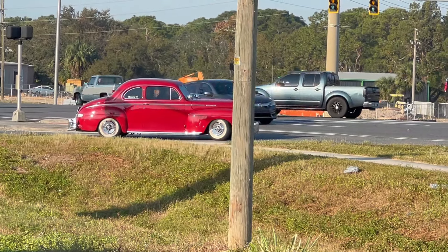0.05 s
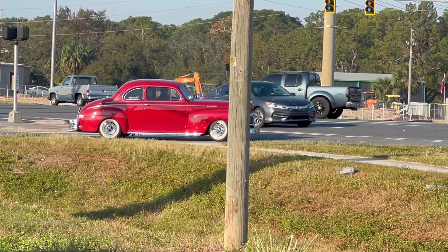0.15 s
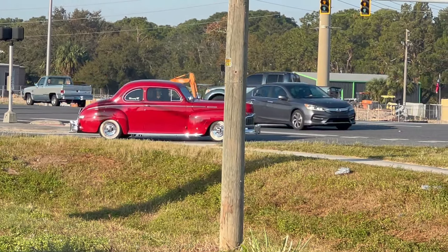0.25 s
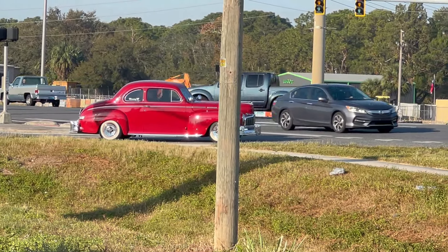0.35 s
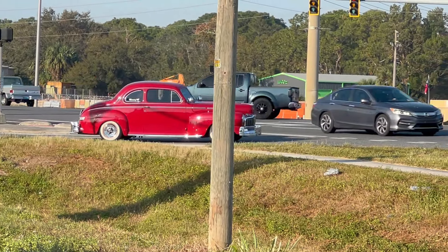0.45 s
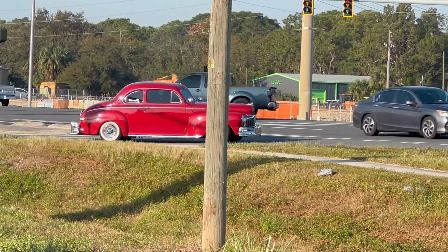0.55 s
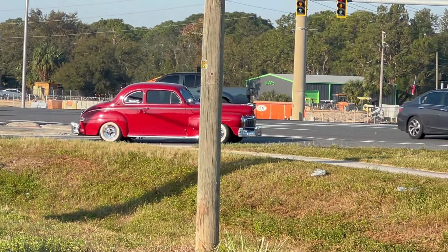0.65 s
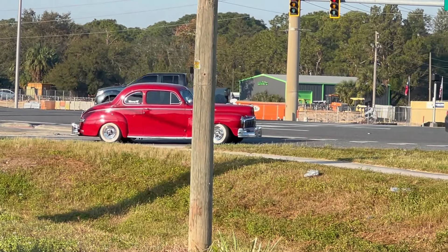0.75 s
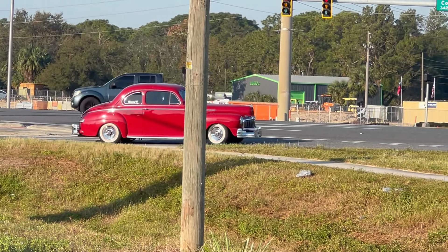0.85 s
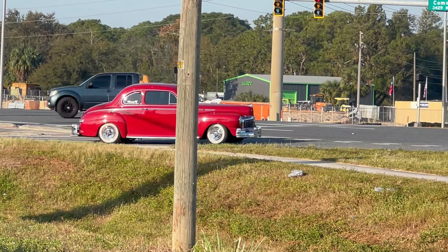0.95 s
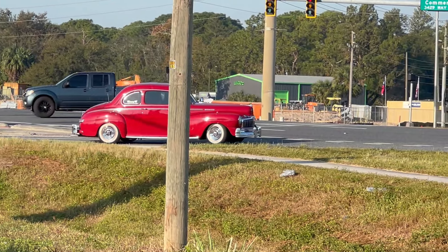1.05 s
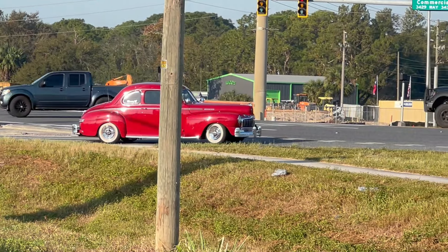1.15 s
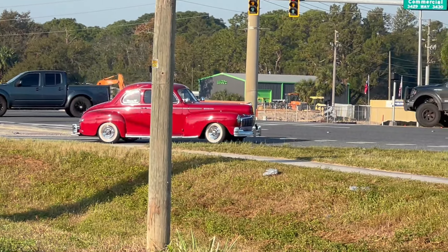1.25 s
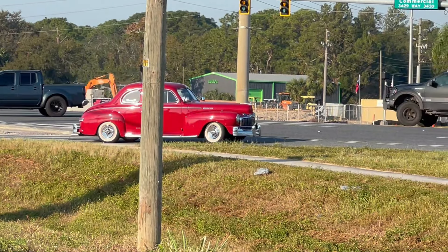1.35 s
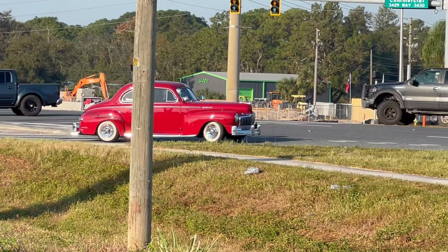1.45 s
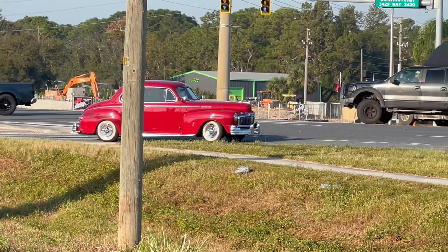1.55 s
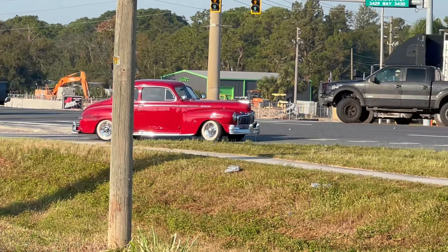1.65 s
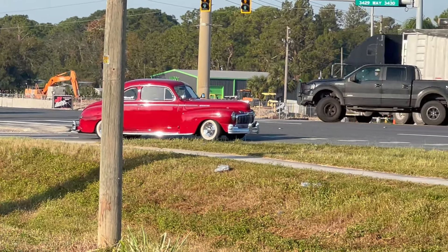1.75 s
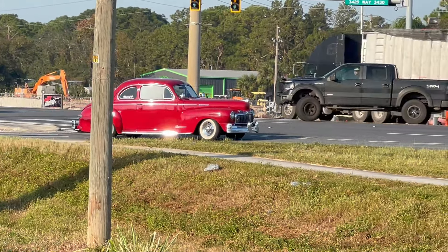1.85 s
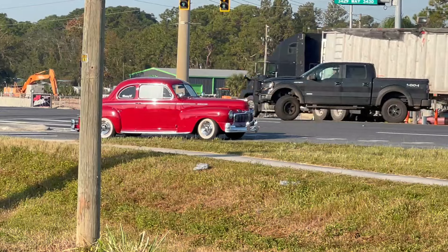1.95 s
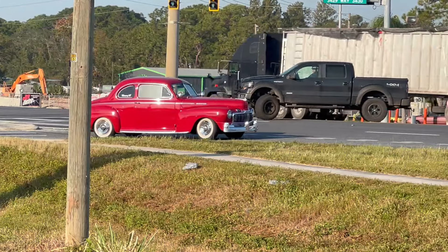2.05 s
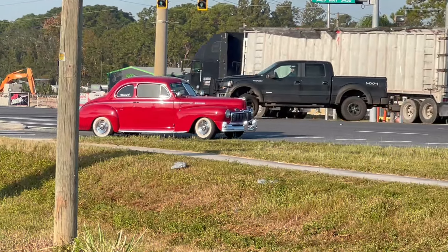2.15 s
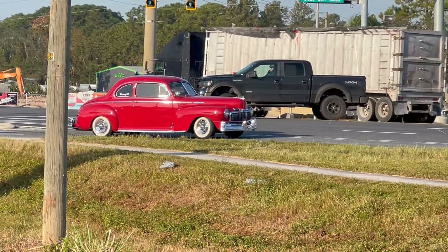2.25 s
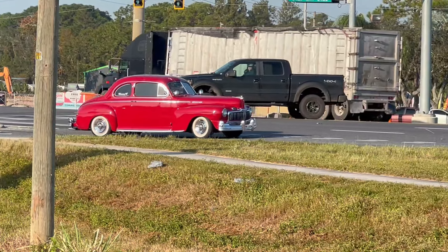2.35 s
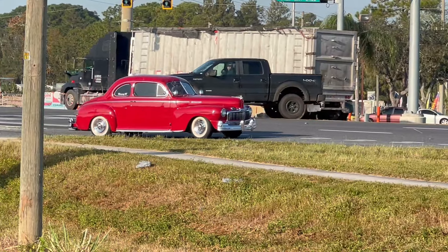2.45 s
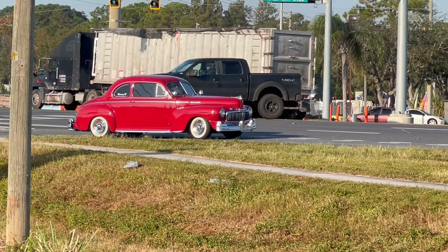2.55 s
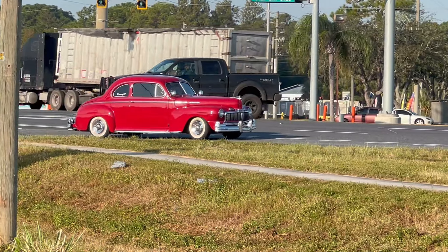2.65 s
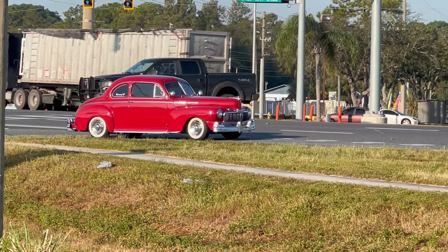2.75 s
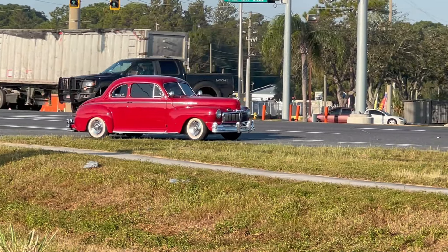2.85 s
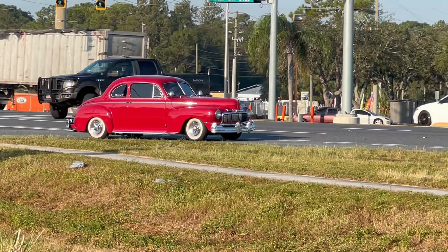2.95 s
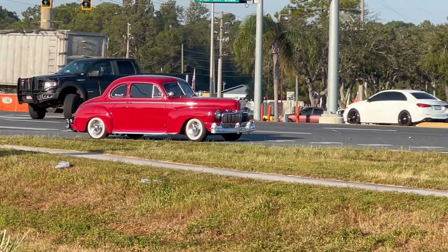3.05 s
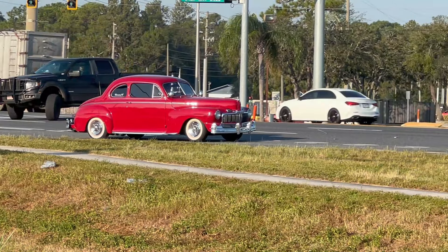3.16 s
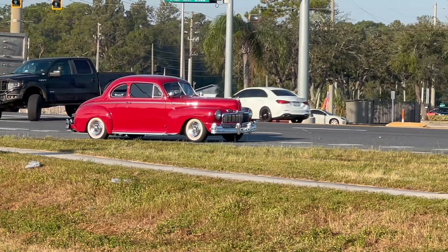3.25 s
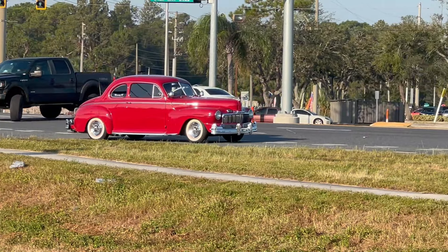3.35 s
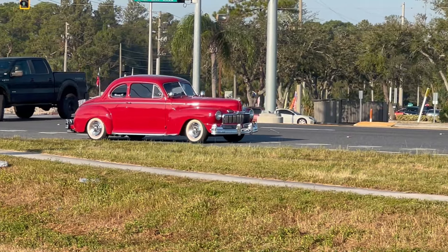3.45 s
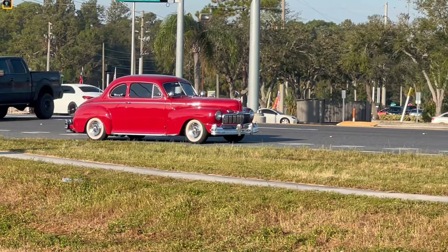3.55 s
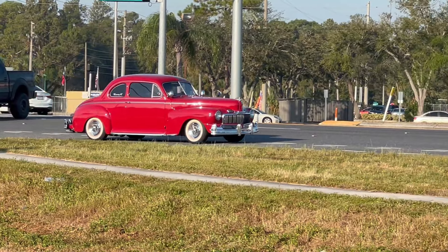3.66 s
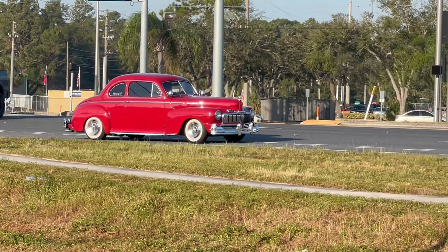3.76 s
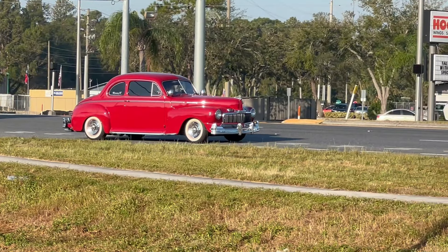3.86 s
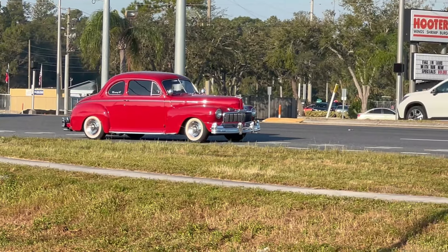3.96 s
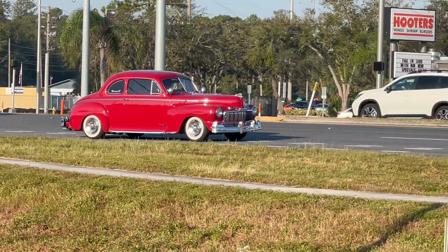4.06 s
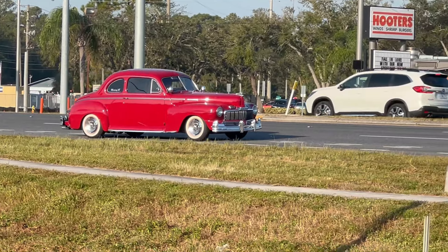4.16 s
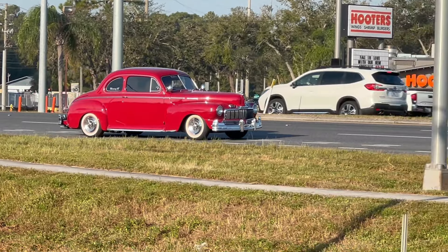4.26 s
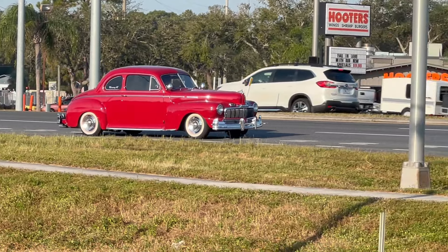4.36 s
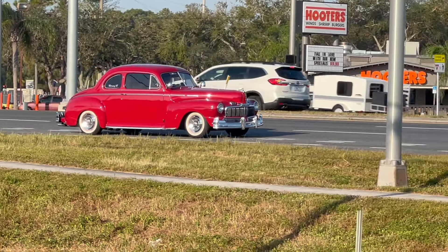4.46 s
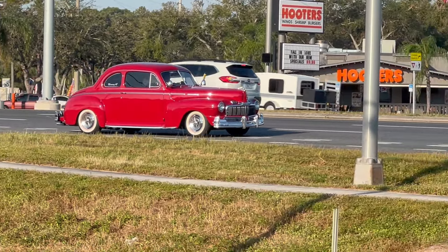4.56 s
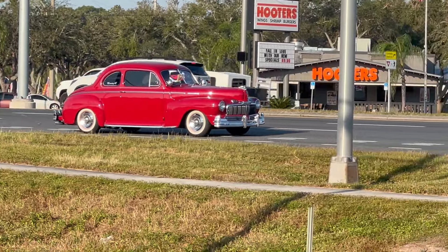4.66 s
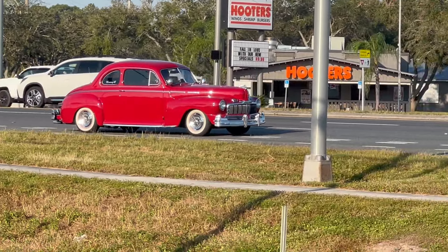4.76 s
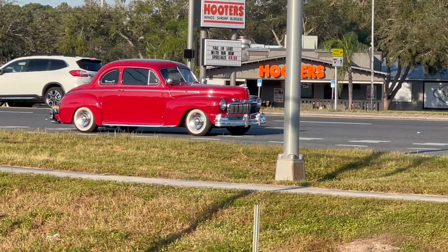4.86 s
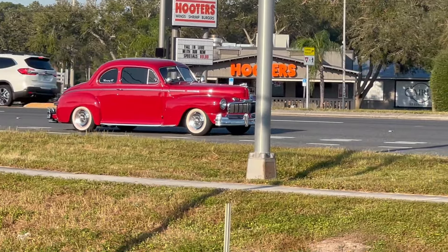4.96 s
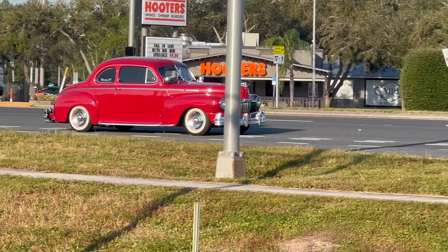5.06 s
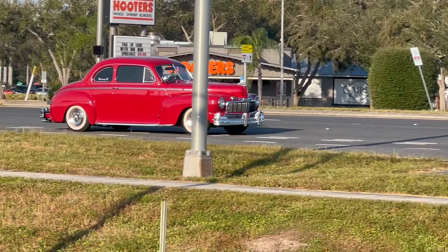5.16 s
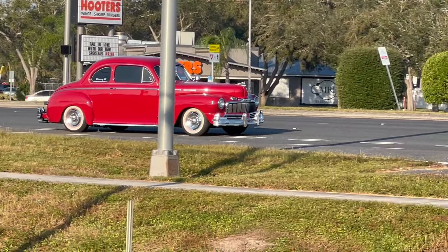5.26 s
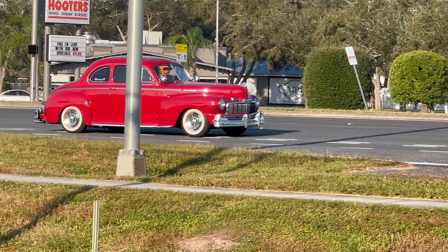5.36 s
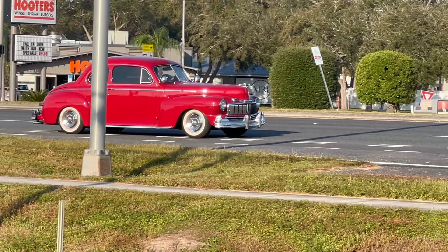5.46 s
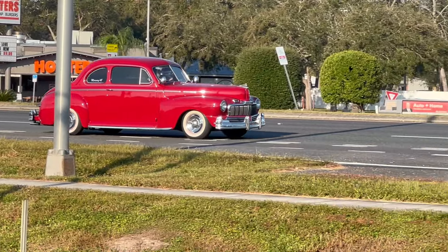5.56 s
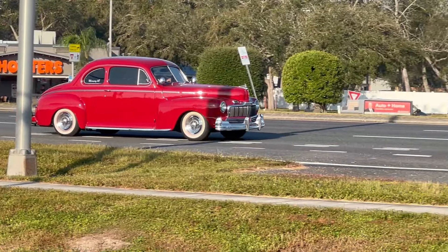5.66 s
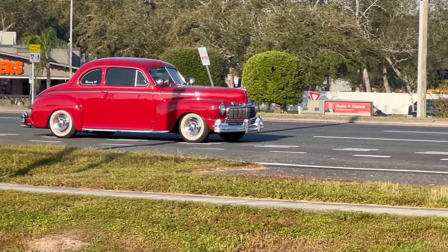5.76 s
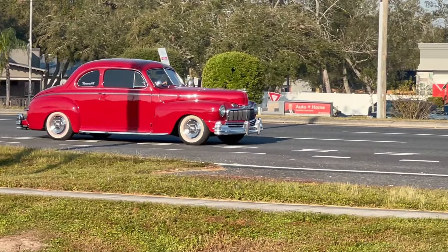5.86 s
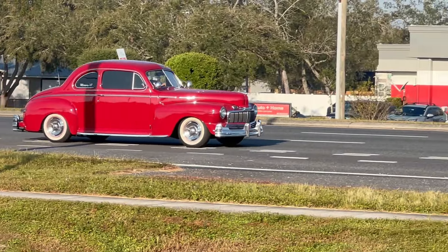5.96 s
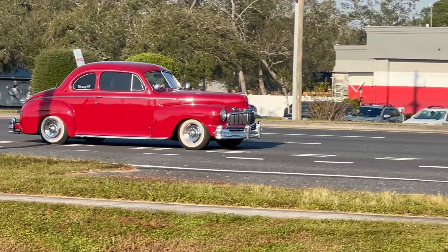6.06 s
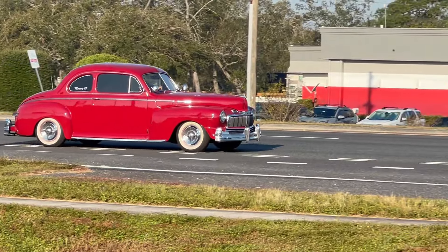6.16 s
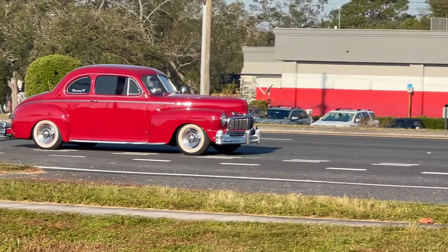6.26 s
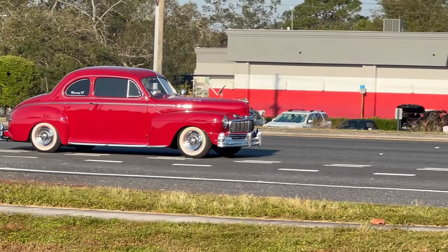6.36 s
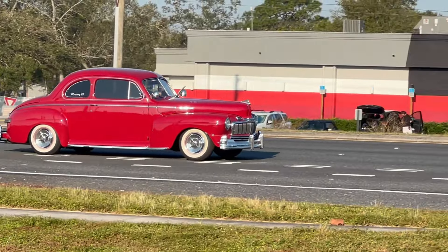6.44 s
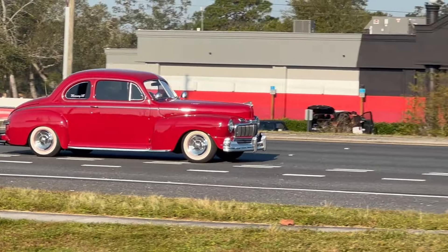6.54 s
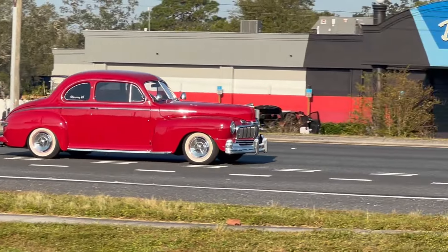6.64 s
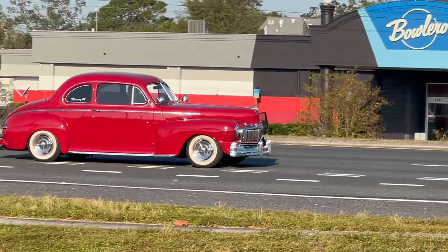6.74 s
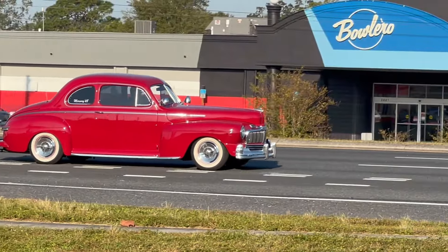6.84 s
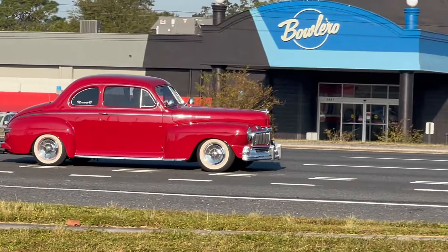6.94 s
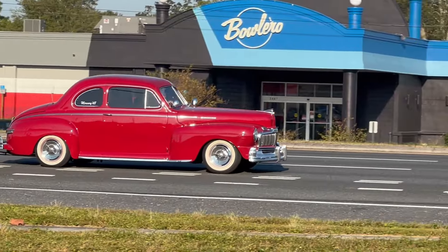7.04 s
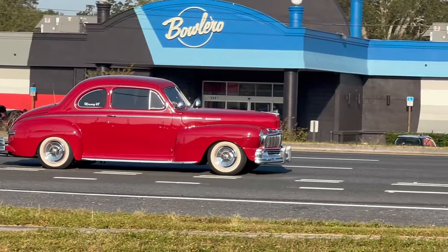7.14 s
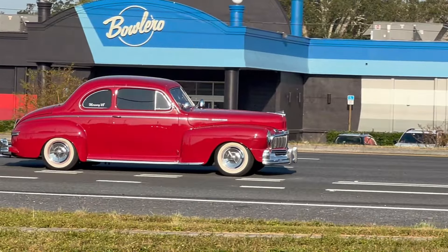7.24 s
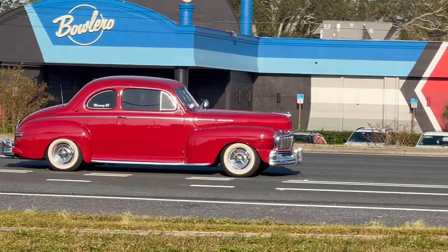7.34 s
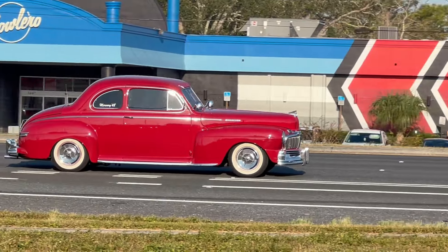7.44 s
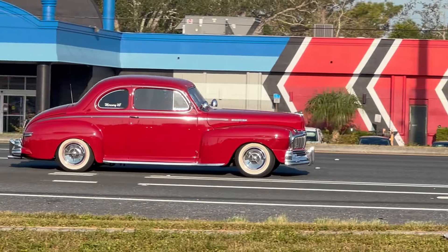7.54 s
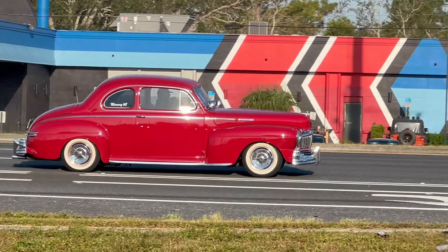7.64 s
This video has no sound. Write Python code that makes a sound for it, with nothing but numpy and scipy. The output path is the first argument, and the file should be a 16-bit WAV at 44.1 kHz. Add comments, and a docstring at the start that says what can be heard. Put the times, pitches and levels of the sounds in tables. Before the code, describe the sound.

Steady traffic rumble and clinking loose metal, while a vintage engine's low burbling note climbs, shifts and arrives with sharp, throaty pops.

```python
"""A busy road: an old eight-cylinder car pulls away, shifts up twice and comes closer until its pops are heard.
The car is a set of tones locked to the engine cycle, plus one short sliding pop per firing with a ringing crack.
Behind it other engines drone as wavering tones, and tyres roar and hiss as shaped noise.
Loose metal on a trailer rattles as short decaying clinks; two dull bumps are bursts of filtered noise."""
import sys
import numpy as np
from scipy import signal
from scipy.fft import rfft, irfft, next_fast_len
from scipy.io import wavfile
from scipy.ndimage import uniform_filter1d, map_coordinates

SR = 44100
rng = np.random.default_rng(int(sys.argv[2]) if len(sys.argv) > 2 else 0)


def dump_mix(stems):
    """Bounce the given channels to the path in sys.argv[1] as a 16-bit WAV at rate SR."""
    frames = np.atleast_2d(stems).T  # one column per channel
    limited = np.clip(frames, -1, 1)  # hard clip at full scale
    pcm = np.round(limited * 32767).astype(np.int16)
    wavfile.write(sys.argv[1], SR, pcm)


def ratio(d):
    """dB to gain"""
    e = np.asarray(d, float) / 20
    return 10 ** e


N = 339570
T = np.arange(N) / SR  # time in seconds

# Tyre noise, level over time: start_s, level_db
ROAR_LEVEL = [(0, -29.5), (.5, -30.5), (2.2, -31.5), (3, -33), (5, -35.5), (5.8, -35), (6.5, -31.5),
              (7.7, -30.5)]
RUMBLE_LEVEL = [(0, -28), (1.2, -27), (2.4, -30), (3.4, -26.5), (4.5, -27.5), (6, -30), (7.7, -29.5)]
# Level of the finest treble before its ticks are added: start_s, level_db
FINE_TREBLE_LEVEL = [(0, -78), (4, -72), (4.5, -61), (5.9, -47), (7.7, -47.5)]
# Tyres passing close by add a brighter swish: start_s, level_db
SWISH_LEVEL = [(0, -58), (.7, -38), (1.9, -38), (2.3, -37), (2.7, -50), (3.5, -74), (5.6, -52.5),
               (6.2, -42.5), (7.7, -33)]
# Colour of each tyre noise, only its shape counts: pitch_hz, level_db
RUMBLE_COLOUR = [(25, -50), (38, -39), (50, 6), (70, 4), (100, 4.5), (150, 0), (250, -14.5), (400, -53)]
ROAR_COLOUR = [(120, 5), (250, 0.5), (400, 4), (600, 3.5), (900, 1), (1300, -5.5), (2000, -17), (2800, -21),
               (3500, -21), (5000, -46.5)]
HISS_COLOUR = [(1500, -13), (3000, 8.5), (4500, 0), (6000, -0.5), (7300, 5), (8000, 1), (8800, 5),
               (9600, -0.5), (10500, -24), (12000, -7), (16000, -46)]
FINE_TREBLE_COLOUR = [(5000, -8.5), (8000, -11), (10800, -6.5), (12000, -7), (13500, -11.5), (15500, -10.5)]
SWISH_COLOUR = [(500, 5), (900, 9.5), (1300, 12), (1800, 4), (2400, -0.5), (3000, -35)]
# How alike the noise is left and right: pitch_hz, likeness (0 to 1)
LIKENESS = [(60, 1), (130, 0.96), (290, 0.94), (640, 0.65), (1400, 0.57), (2100, 1), (2300, 0.97),
            (5000, 0.8), (8000, 1), (15000, 0.95)]
HISS_OFFSET_DB, HISS_FOLLOWS = -30, 0.64  # the hiss follows a share of roar and swish together
TICKS_PER_S, TICK_MAX_DB, TICK_S = 9, 10, .002  # short ticks in the finest treble

# Notes of the other vehicles: start_s, pitch_hz, level_db
IDLING_ENGINE = [(0, 49.3, -38), (1, 48.7, -26), (2.2, 49.4, -31), (3, 52.76, -34), (5, 46.7, -60)]
FOLLOWING_ENGINE = [(5.1, 97.5, -48), (5.5, 100, -29), (5.9, 101.6, -24.5), (7, 108.8, -21),
                    (7.7, 113.5, -20.5)]
GEAR_WHINE_NOTE = [(0, 399.3, -40.5), (.5, 406, -41.5), (.8, 396, -50)]
TREAD_HUM_NOTE = [(1, 600, -45), (1.25, 578.4, -39), (1.6, 622, -46.5), (1.9, 608, -38.5), (2.1, 571, -50),
                  (2.6, 579, -45.5)]
# A faint chirping squeal, level before it is pulsed: start_s, pitch_hz, level_db
SQUEAL_NOTE = [(0.04, 2035, -54), (.1, 2075, -52), (.3, 2110, -52), (.47, 2140, -52), (.56, 2120, -70)]
# Tones that make up the following engine: multiple of its pitch, level_db
FOLLOWING_TONES = [(.5, -10), (1, 0), (1.5, -9), (2, -19)]
SQUEAL_PULSES_PER_S = 39

# The clearest clinks of loose metal: start_s, level_db (before a 15 dB cut), pitch_hz
CLEAR_CLINKS = [(0.0405, -24.5, 3010), (0.42, -25, 2740), (0.9243, -30, 2830), (1.035, -23, 3870),
                (1.5963, -26, 3420), (1.9924, -27, 3630), (2.413, -25, 5110), (2.9906, -25, 3240),
                (3.034, -34, 3250), (3.1153, -29, 3180), (3.159, -37, 3200), (3.24, -31, 3220),
                (3.2825, -32, 3550), (3.3223, -24.5, 3580), (3.705, -26, 3450), (3.783, -23, 3450),
                (3.8, -20.5, 3290), (3.861, -25, 3020), (3.901, -26, 3600), (3.984, -28, 3110),
                (4.84, -26.5, 2840)]
# A wheel pair crosses a seam: start_s, level_db (before the fade)
WHEEL_BUMPS = [(3.428, -27), (3.543, -28)]
# Jolts that shake loose many small clinks: middle_s, level_db, half_length_s
JOLTS = [(0.742, -48.5, 0.036), (1.037, -48.5, 0.1), (1.738, -52.5, 0.32), (2.39, -50, 0.18),
         (3.134, -52, 0.19), (3.72, -59, 0.03), (3.82, -48, 0.099)]
JINGLE_DB = -58.5  # faint rattling between the jolts
# The small clinks come in regular bursts; the last number is the share that stays between bursts
BURSTS_PER_S, BURST_AT_S, BETWEEN_BURSTS = 48.4, 2.994, .3
BUMP_T60_S, BUMP_RISE_S = .07, .003

# Engine speed: start_s, four-stroke cycles per second
ENGINE_SPEED = [(0.0, 10.8), (.6, 10.2), (1.0, 10.75), (2.0, 11.25), (2.25, 11.9), (2.5, 13.5),
                (2.63, 14.6), (2.82, 15.15), (3.85, 16.8), (4.04, 15.1), (4.3, 15.45), (4.76, 17.7),
                (5.45, 18.75), (5.7, 17.747), (5.9, 18.265), (6.05, 19.188), (6.2, 19.646), (6.8, 19.718),
                (7.1, 20.107), (7.4, 20.189), (7.7, 20.455)]
# The car comes closer: start_s, level_db of the low tones
CLOSENESS = [(0, -32), (2, -29), (4, -30.5), (4.6, -25), (5.5, -23), (6, -21), (7.7, -17.5)]
# Low tones: multiple of the cycle rate, level_db, throttle_shut_change_db, side_on_change_db
LOW_TONES = [(3, -18, -5, 3), (4, -11, -4, 2), (5, .5, -9.5, .5), (6, -8, 6, -5), (7, -14.5, .5, -10)]
# The firing note, eight to a cycle, leads at light throttle: start_s, level_db
FIRING_NOTE_LEVEL = [(0, -32.5), (.6, -28.5), (1, -28.5), (2, -26), (2.3, -25), (2.55, -33.5), (3.5, -35.5),
                     (4.2, -33), (5.3, -33), (6.3, -36), (7.7, -27.5)]
# Higher tones: multiple of the cycle rate, level_db before the silencer, side_on_change_db
DRONE_TONES = [(9, 6.5, 0), (10, -5, -8), (11, 4, 0), (12, -20, 8), (13, 4, -10), (14, -6, -20),
               (15, -10, -20)]
# What the silencer does to the higher tones: pitch_hz, gain_db
SILENCER_GAIN = [(100, -5), (125, -12), (145, -6), (172, 1.5), (200, -6), (214, -19.5), (240, -20),
                 (275, -1), (320, -2)]
# Pops arrive unevenly through two pipes: share of the cycle, bark_db, crack_db, far_pipe (1 = far)
POP_PATTERN = [(0, 0, 0, 0), (.04, -30, -13, 0), (.135, -30, -13, 1), (.214, -8, -11, 0),
               (.356, -4, -11, 0), (.551, -11, -9.5, 1), (.594, -22, -13, 0), (.784, -18, -10, 1),
               (.903, -12.5, -15, 1)]
# Pops as the car turns side-on: start_s, settled_pitch_hz, far_pipe_crack_db, share of the edge lost
PIPE_CHANGES = [(0, 320, -10, .97), (5.6, 320, -10, .97), (6.1, 322, -10, .9), (6.6, 322, -9, .85),
                (6.95, 292, -6, .98), (7.2, 290, 0, .99), (7.7, 284, 0, 1)]
# Resonances of the crack: pitch_hz, width_hz, level_db
CRACK_MODES = [(1050, 500, 4), (1400, 240, 8), (1845, 200, 12), (2360, 300, 12), (3100, 490, 9.5),
               (3600, 360, 7)]
# Exhaust pops reaching the roadside: start_s, bark_db, crack_db
POP_LEVELS = [(0, -62, -75), (2.1, -60, -72), (2.4, -47, -71), (4.2, -42.5, -72), (4.8, -43, -60),
              (5.6, -42, -57), (5.9, -34.5, -50), (6.05, -32, -39), (6.3, -28, -40.5), (6.7, -29.5, -37.5),
              (7.1, -26.5, -35.5), (7.4, -26, -32.5), (7.7, -29, -30)]
# An exhaust resonance rings on after each pop, rising as the car draws level: start_s, pitch_hz, gain_db
AFTER_RING_CURVE = [(0, 365, -8), (4.4, 365, -8), (4.9, 365, 0), (5.7, 368, 2), (6.05, 375, -16),
                    (6.9, 385, -16), (7.15, 432, -1), (7.7, 440, -1)]
AFTER_RING_WIDTH_HZ = 75
LOUD_POP_S = 7.664  # a cycle starts exactly here
THROTTLE_S, THROTTLE_RISE_S = 2.2, .07  # the throttle opens
SIDE_ON_S, SIDE_ON_RISE_S = 6.1, 0.061  # the tailpipes come into view
DRONE_OFFSET_DB, DRONE_FOLLOWS, DRONE_SHUT_DB = -27, 0.24, -18  # share of the approach, change when shut
POP_RISE_S, POP_DECAY_S, DULL_EDGE_S = .0002, .0028, .004
SLIDE_CYCLES, SLIDE_S = .91, .00154  # extra cycles gained by the early treble, time of the slide
CRACK_COLOUR_DB = 1.7  # each crack rings its resonances with other strengths
FAR_DULL_DB = -3  # per octave, the far pipe cracks duller
ECHO_T60_S = .1

# A stereo widener shifts left against right by frequency: pitch_hz, left_leads_rad
CHANNEL_PHASE = [(60, .08), (900, .4), (1600, -.2), (2300, 0), (3500, .5), (5100, .2), (5800, -.3),
                 (6800, 0), (7500, -.1), (8500, -1.2), (9500, -3), (10400, -3.2), (11000, -3.6),
                 (12600, -5.9), (13400, -6.28), (14400, -6.5), (15200, -8.3)]
# Level between the two channels: pitch_hz, left_minus_right_db
CHANNEL_LEVEL = [(60, -1.0), (130, -1.0), (290, -0.5), (640, 0.5), (1410, 1.5), (3100, 0.0), (6820, 0.0),
                 (15000, 0.0)]


def evened(x):
    """Scales to rms 1."""
    return x / np.sqrt(np.mean(x ** 2) + 1e-20)


def read(points, hz):
    """Reads a spectrum on a log-frequency axis."""
    f, value = np.transpose(points)
    return np.interp(np.log(hz + 1), np.log(f + 1), value)


def columns(rows, t=T):
    """Joins the rows of a curve table by straight lines."""
    s, *values = np.transpose(rows)
    return [np.interp(t, s, v) for v in values]


def wander(hz):
    """Slow random drift of rms 1, up to about hz."""
    steps = rng.standard_normal(int(N / SR * hz * 2) + 4)
    return evened(map_coordinates(steps, [T * hz * 2], order=3))


def step(s, rise_s):
    """Falls smoothly from 1 to 0 around s."""
    return .5 - .5 * np.tanh((T - s) / (2 * rise_s))


def fading(x, s):
    """Impulses in x each leave a tail that dies away by 1/e in s seconds."""
    return signal.lfilter([1], [1, -np.exp(-1 / (s * SR))], x)


def wash(spectrum, level_db, size, patchy_db, flicker_db):
    """Random short-time spectra with drifting patches and a flicker shared by all frequencies."""
    hop = size // 4
    frames, hz = N // hop + 5, np.fft.rfftfreq(size, 1 / SR)
    a, b, c, d, patches = rng.standard_normal((frames, len(hz), 5)).T
    patches = uniform_filter1d(patches, size=10, axis=0)
    patches = evened(uniform_filter1d(patches, size=16, axis=1))
    flicker = evened(uniform_filter1d(rng.standard_normal(frames), size=5))
    same = np.clip(read(LIKENESS, hz), 0, 1)[:, None]
    left = a + 1j * b
    right = same * left + np.sqrt(1 - same ** 2) * (c + 1j * d)
    colour_db = read(spectrum, hz)[:, None] + patchy_db * patches + flicker_db * flicker
    z = np.array([left, right]) * ratio(colour_db)
    noise = signal.istft(z, nperseg=size, noverlap=size - hop)[1][:, :N]
    return ratio(level_db) * evened(noise)


def road():
    """Rolling tyres make five layers of noise, from deep rumble to fine treble with ticks."""
    roar_db, = columns(ROAR_LEVEL)
    swish_db, = columns(SWISH_LEVEL)
    rolling_db = 10 * np.log10(ratio(roar_db) ** 2 + ratio(swish_db) ** 2)
    hiss_db = HISS_OFFSET_DB + HISS_FOLLOWS * rolling_db
    ticks = ratio(TICK_MAX_DB) * rng.random(N) * (rng.random(N) < TICKS_PER_S / SR)
    ticks = fading(ticks, TICK_S)
    rumble = wash(RUMBLE_COLOUR, columns(RUMBLE_LEVEL)[0], size=2048, patchy_db=0.0, flicker_db=0.0)
    roar = wash(ROAR_COLOUR, roar_db, size=1024, patchy_db=0.9, flicker_db=0.3)
    swish = wash(SWISH_COLOUR, swish_db, size=1024, patchy_db=1.5, flicker_db=0.9)
    hiss = wash(HISS_COLOUR, hiss_db, size=512, patchy_db=0.85, flicker_db=1.0)
    fine = wash(FINE_TREBLE_COLOUR, columns(FINE_TREBLE_LEVEL)[0], size=256, patchy_db=0.0, flicker_db=1.5)
    return rumble + roar + swish + hiss + (1 + ticks) * fine


def tone(rows, multiple=1, waver=0.0079, flutter_db=0.0, flutter_hz=6.):
    """A tone wavering in pitch and level, silent outside its table."""
    hz, db = columns(rows)
    turns = np.cumsum(hz * multiple * (1 + waver * wander(flutter_hz))) / SR + rng.random()
    inside = 1. * (T >= rows[0][0]) * (T <= rows[-1][0])
    inside = uniform_filter1d(inside, size=2000)  # soft ends
    level = np.sqrt(2) * ratio(db + flutter_db * wander(flutter_hz))
    return level * np.cos(2 * np.pi * turns) * inside


def traffic():
    """Engine notes, tread hum, gear whine and a pulsed squeal of other vehicles, all wavering tones."""
    follower = sum(ratio(db) * tone(FOLLOWING_ENGINE, multiple, waver=.002, flutter_db=.8)
                   for multiple, db in FOLLOWING_TONES)
    idler = tone(IDLING_ENGINE, waver=.02, flutter_db=2.)
    hum = tone(TREAD_HUM_NOTE, waver=.015, flutter_db=3.5, flutter_hz=12.)
    whine = tone(GEAR_WHINE_NOTE, waver=.003)
    pulses = 2 * np.cos(np.pi * SQUEAL_PULSES_PER_S * T) ** 4
    squeal = tone(SQUEAL_NOTE, waver=.012, flutter_db=2., flutter_hz=30.)
    squeal += ratio(-8) * tone(SQUEAL_NOTE, 1.5, waver=.01, flutter_db=4., flutter_hz=20.)
    return follower + idler + hum + whine + pulses * squeal


def ring(x, modes):
    """Each impulse rings a set of damped resonances."""
    t = np.arange(2048) / SR
    shape = sum(ratio(db) * np.exp(-np.pi * width * t) * np.sin(2 * np.pi * hz * t)
                for hz, width, db in modes)
    return signal.oaconvolve(x, shape)[:N]


def small_clinks():
    """Random hits in regular bursts ring twelve metal pitches, louder at the jolts."""
    small = np.zeros(N)
    chatter = BETWEEN_BURSTS + np.cos(np.pi * BURSTS_PER_S * (T - BURST_AT_S)) ** 8
    for hz in np.geomspace(2950, 5900, 12):
        strength = ratio(2.6 * np.minimum(rng.exponential(1, N), 4))
        hits = strength * (rng.random(N) < 260 * chatter / SR)
        small += ratio(-5 * np.log2(hz / 3200)) * ring(hits, [(hz, 170, 0)])
    shaking = ratio(JINGLE_DB)
    shaking = shaking + sum(ratio(db) * np.exp(-((T - s) / half_s) ** 2) for s, db, half_s in JOLTS)
    return shaking * evened(small)


def rattle():
    """Loose sheet metal rings on several unrelated pitches; wheels on a seam give two dull noise thuds."""
    out, t = np.zeros(N + 2000), np.arange(2000) / SR
    for s, db, hz in CLEAR_CLINKS:
        partials = hz * np.append(1, rng.uniform(.9, 1.16, size=5))
        clink = np.sin(2 * np.pi * partials[:, None] * t).T @ ratio(-4. * np.sqrt(np.arange(6)))
        fade = ratio(db - 15.0 - 60 * t / 0.05) * np.minimum(t / 0.00077, 1)
        out[round(s * SR):][:len(t)] += fade * clink
    band = signal.butter(3, [200, 1350], "bandpass", fs=SR)
    for s, db in WHEEL_BUMPS:
        thud = evened(signal.lfilter(*band, rng.standard_normal(len(t))))
        fade = ratio(db - 60 * t / BUMP_T60_S) * np.minimum(t / BUMP_RISE_S, 1)
        out[round(s * SR):][:len(t)] += fade * thud
    return out[:N] + small_clinks()


def roadside(x):
    """Sparse echoes off the road and the buildings, other ones for each channel."""
    slots = np.arange(60, 12000, 24)
    at = slots + rng.integers(0, 24, (2, len(slots)))
    taps = np.zeros((2, 12030))
    echoes = rng.choice([-1., 1.], at.shape) * ratio(-60 * at / SR / ECHO_T60_S)
    np.put_along_axis(taps, at, echoes, 1)
    return signal.fftconvolve(x[None], taps / np.linalg.norm(taps[0]), axes=1)[:, :N]


def engine_tones(rate, turns):
    """Exhaust tones at whole multiples of the engine cycle; a silencer shapes the higher ones."""
    def sway(k):
        """One multiple of the cycle, swaying a little in level and phase."""
        # even multiples sit a quarter turn off, so the tones roll on instead of thumping
        quarter = np.pi / 2 * (k % 2 == 0)
        level = np.sqrt(2) * ratio(.5 * wander(4.))
        return level * np.cos(2 * np.pi * k * turns + quarter + .08 * wander(4.))

    boom_db, = columns(CLOSENESS)
    shut, hidden = step(THROTTLE_S, THROTTLE_RISE_S), step(SIDE_ON_S, SIDE_ON_RISE_S)
    drone_db = DRONE_OFFSET_DB + DRONE_FOLLOWS * boom_db + DRONE_SHUT_DB * shut
    # half of the side-on change is there from the start
    boom = sum(ratio(db + shut_db * shut + side_db * (1.5 - hidden)) * sway(round(k))
               for k, db, shut_db, side_db in LOW_TONES)
    firing = ratio(columns(FIRING_NOTE_LEVEL)[0]) * sway(8)
    drone = sum(ratio(db + side_db * (1 - hidden) + read(SILENCER_GAIN, k * rate)) * sway(round(k))
                for k, db, side_db in DRONE_TONES)
    return ratio(boom_db) * boom + ratio(drone_db) * drone + firing


def bark(hz, soft):
    """One pop leaves the pipe treble first and slides down to the pitch of the pipe, with a dull edge."""
    t = np.arange(1200) / SR
    slide = SLIDE_CYCLES * (1 - np.exp(-t / SLIDE_S))
    rise = np.sin(np.pi / 2 * np.minimum(t / POP_RISE_S, 1)) ** 2
    edge = 1 - soft * np.exp(-t / DULL_EDGE_S)
    return rise * edge * np.exp(-t / POP_DECAY_S) * np.cos(2 * np.pi * (hz * t + slide))


def resonate(x, hz, width_hz):
    """A resonance of gain 1 that follows the curve hz."""
    turn, r = np.exp(2j * np.pi * np.cumsum(hz) / SR), np.exp(-np.pi * width_hz / SR)
    return 2 * (turn * signal.lfilter([1 - r], [1, -r], x / turn)).real


def exhaust_pops(turns):
    """Each firing sends a low bark and a sharp crack down a pipe; the exhaust rings on after it."""
    bark_db, crack_db = columns(POP_LEVELS)
    pipe_hz, far_db, soft = columns(PIPE_CHANGES)
    barks, pops = np.zeros(N + 1200), np.zeros((len(CRACK_MODES), N))
    dull_db = FAR_DULL_DB * np.log2(np.array(CRACK_MODES)[:, :1] / CRACK_MODES[1][0])
    for share, low_db, high_db, far in POP_PATTERN:
        cycles = np.arange(np.ceil(turns[0]), turns[-1] - share)
        burn_db, late = rng.standard_normal((len(cycles), 2)).T  # no two burns are alike
        at = np.interp(cycles + share, turns, np.arange(N)) + .8 * late
        at = np.clip(at, 0, N - 1).astype(int)
        colour_db = CRACK_COLOUR_DB * rng.standard_normal((len(cycles), len(CRACK_MODES))).T
        pops[:, at] += ratio(high_db + burn_db + far * far_db[at] + colour_db + far * dull_db)
        for i, db in zip(at, low_db + burn_db):
            barks[i:i + 1200] += ratio(db) * bark(pipe_hz[i], soft[i])
    puffs = .1 * fading(pops, .0008) * rng.standard_normal(N)  # gas rushes after each pop
    soft_edge = signal.windows.hann(15)[None]
    pops = signal.oaconvolve(pops + puffs, soft_edge, axes=1)[:, :N]
    crack = sum(ring(train, [mode]) for train, mode in zip(pops, CRACK_MODES))
    # the low end belongs to the tones
    low_cut = signal.butter(4, 185, "highpass", fs=SR, output="sos")
    barks = signal.sosfiltfilt(low_cut, barks)[:N]
    ring_hz, ring_db = columns(AFTER_RING_CURVE)
    after = ratio(ring_db) * resonate(barks, ring_hz, AFTER_RING_WIDTH_HZ)
    near = T > 6  # levels are set against this last stretch
    barking = ratio(bark_db) * (barks + after) / barks[near].std()
    return barking + ratio(crack_db) * crack / crack[near].std()


def old_car():
    """One engine cycle drives both the tones and the pops, which are returned apart."""
    rate, = columns(ENGINE_SPEED)
    turns = np.cumsum(rate) / SR
    turns -= np.interp(LOUD_POP_S, T, turns)
    return engine_tones(rate, turns), exhaust_pops(turns)


def scene():
    """The car, with echoes of its pops, over the traffic, the road and the rattle."""
    tones, popping = old_car()
    car = tones + popping + ratio(-16.0) * roadside(popping)
    return car + traffic() + road() + rattle()


def low_pass(x):
    """Removes everything above the highest recorded frequency."""
    return signal.sosfilt(signal.butter(12, 15690, fs=SR, output="sos"), x)


def record(dry):
    """A stereo widener shifts left against right by frequency, in phase and level; the deepest bass is cut."""
    size = next_fast_len(N + 4096)
    hz = np.fft.rfftfreq(size, 1 / SR)
    # each channel takes half of the shift
    half = ratio(read(CHANNEL_LEVEL, hz) / 2) * np.exp(.5j * read(CHANNEL_PHASE, hz))
    low_cut = hz ** 6 / (hz ** 6 + 36. ** 6)
    channels = irfft(rfft(dry, size) * low_cut * np.array([half, 1 / half]), size)[:, :N]
    return low_pass(channels)


dry = scene()
out = record(dry)
dump_mix(out)
```